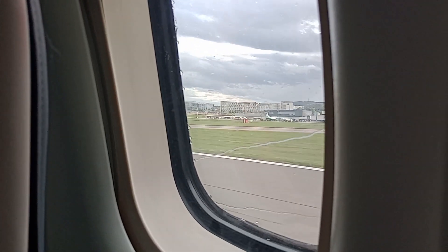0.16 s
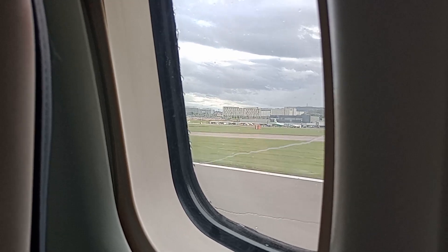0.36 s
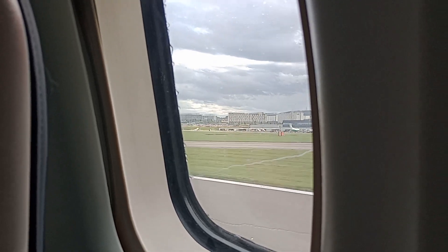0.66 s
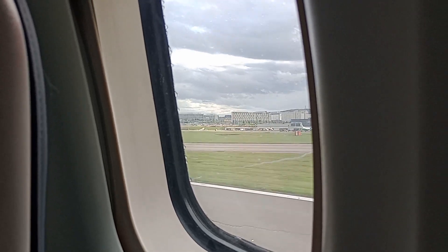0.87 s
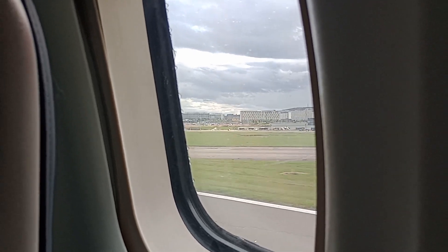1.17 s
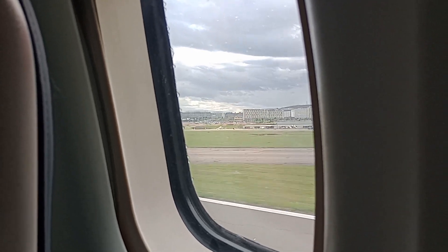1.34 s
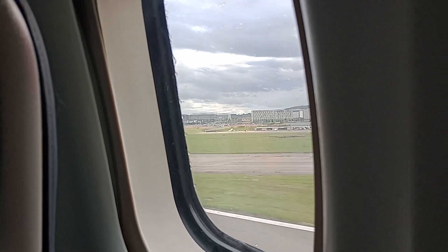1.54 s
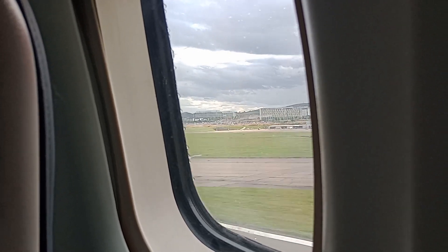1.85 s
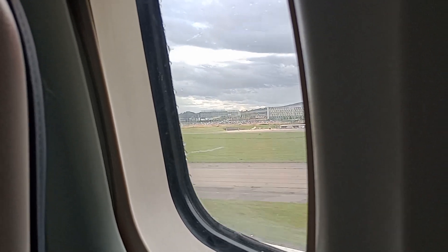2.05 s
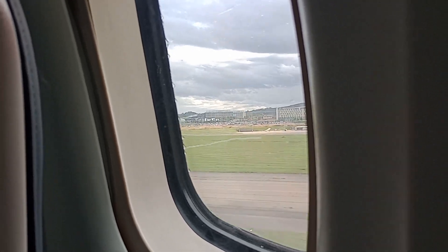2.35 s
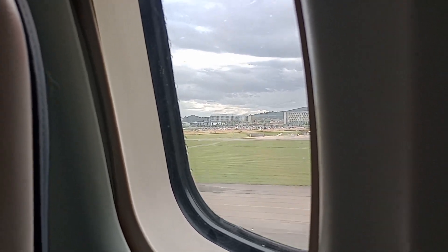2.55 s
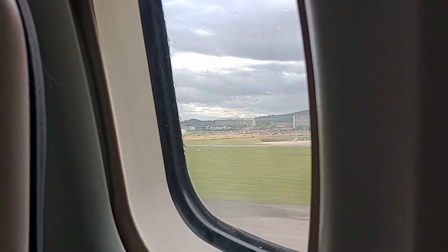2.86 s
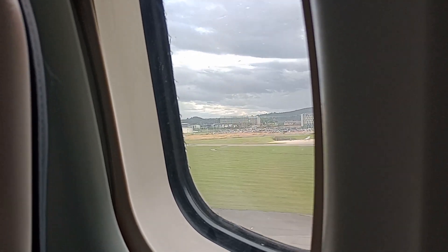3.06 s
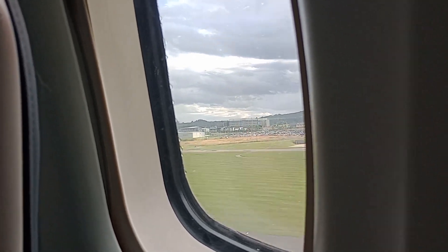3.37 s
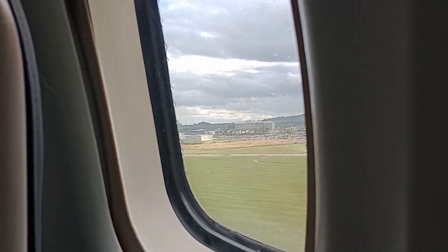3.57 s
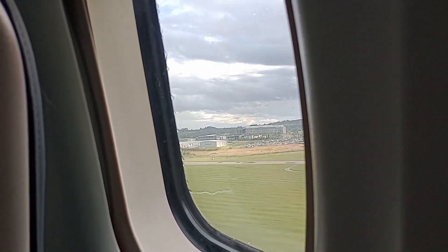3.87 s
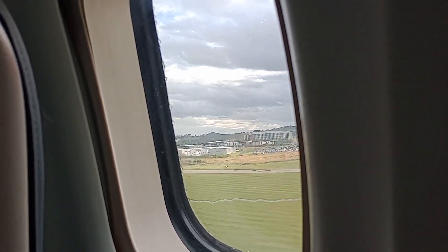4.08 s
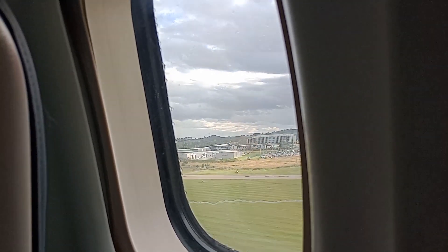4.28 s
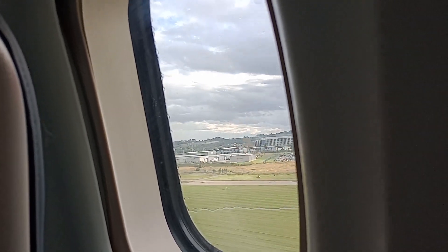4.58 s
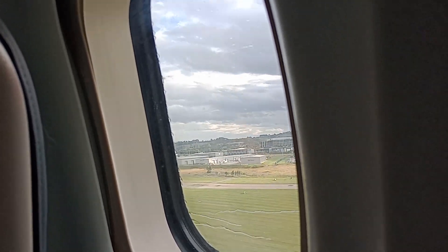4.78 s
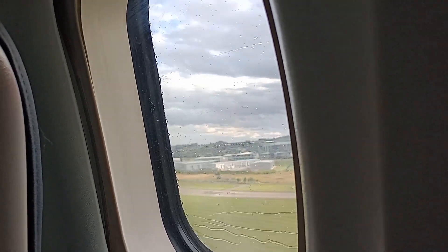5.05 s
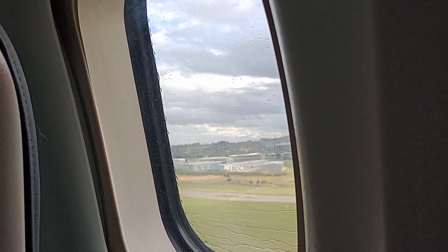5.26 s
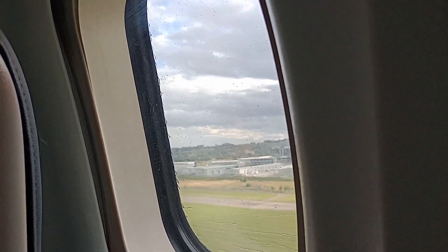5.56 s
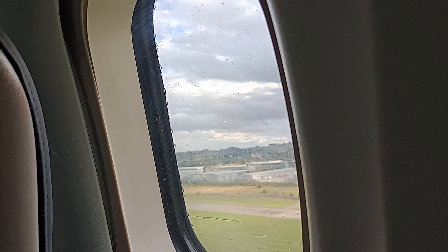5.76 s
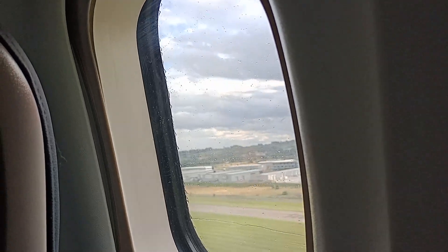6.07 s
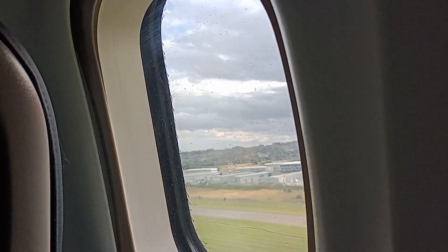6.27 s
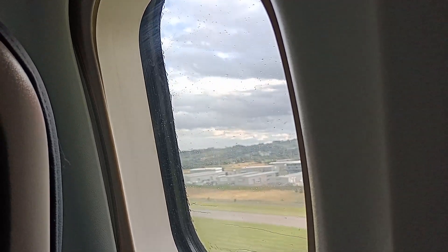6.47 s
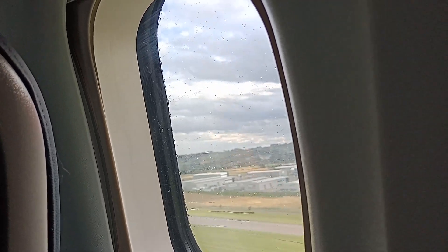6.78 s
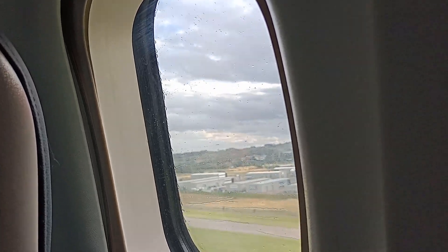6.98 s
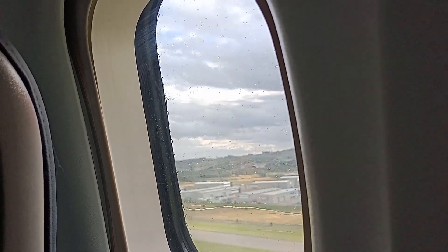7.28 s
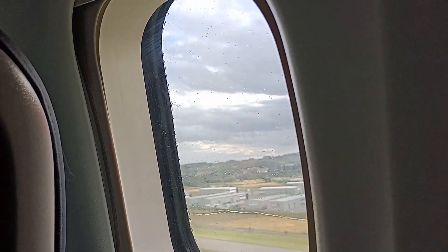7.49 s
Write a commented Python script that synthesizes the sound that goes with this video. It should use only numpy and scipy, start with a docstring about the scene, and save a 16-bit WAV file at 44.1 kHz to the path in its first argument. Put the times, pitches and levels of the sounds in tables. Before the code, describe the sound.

Heard from a window seat inside a turboprop airliner, the propellers hold a deep, steady drone at takeoff power. The wheels rumble over runway bumps and trim panels tick faintly, while air rushes along the hull under thin, high engine whines. Late on, the landing gear thumps twice as the plane lifts off, and the rumble eases into a smoother drone.

```python
"""Turboprop take-off from a window seat

Inside an airliner, microphone close to the window. The propeller blades drive a deep drone into the
cabin. The wheels rumble on the runway and shake the trim until the gear thumps at lift-off; then the
drone is smoother. Air rushes along the hull, and thin turbine and gearbox whines ride on top."""
import sys
import numpy as np
from scipy import signal
from scipy.fft import rfft, irfft, next_fast_len
from scipy.io import wavfile
from scipy.ndimage import uniform_filter1d, minimum_filter1d, map_coordinates

SR = 44100
rng = np.random.default_rng(int(sys.argv[2]) if len(sys.argv) > 2 else 0)


def waveform_to_disk(signal):
    """Save audio, clipped to [-1, 1], as 16-bit WAV at the path in sys.argv[1]."""
    frames = np.transpose(np.atleast_2d(signal))
    scaled = np.clip(frames, -1, 1) * 32767
    samples = np.round(scaled).astype(np.int16)
    wavfile.write(sys.argv[1], SR, samples)


N = 336483
TIME = np.arange(N) / SR
BLADE_HZ = 119.95  # the governor holds the propellers at one blade-pass rate


def amp(db):
    """Decibels to gain."""
    return 10 ** (np.asarray(db) / 20)


def unit(x):
    """Scale to rms 1."""
    return x / np.sqrt(np.mean(np.abs(x) ** 2) + 1e-20)


def curve(points):
    """Straight lines through (t/s, value) points, one value per sample."""
    return np.interp(TIME, *np.transpose(points))


def swell(s, half_s):
    """A bell of height 1 around one moment."""
    return np.exp(-.5 * ((TIME - s) / half_s) ** 2)


def wobble(rate):
    """A smooth random curve, rate knots a second."""
    knots = rng.standard_normal(4096)
    return map_coordinates(knots, [TIME[::32] * rate], mode="wrap").repeat(32)[:N]


def filtered(x, response):
    """x through a frequency response."""
    size = next_fast_len(N + SR // 2)
    return irfft(rfft(x, size) * response(np.fft.rfftfreq(size, 1 / SR)), size)[:N]


def coloured(x, spectrum):
    """x shaped by (f/Hz, level/dB) points on a log axis, at rms 1."""
    f, db = np.transpose(spectrum)
    return unit(filtered(x, lambda hz: amp(np.interp(np.log(hz + 1), np.log(f), db))))


def mottled(x, depth_db, frame, bins, frames):
    """x with random gain in patches, bins wide and frames long."""
    spectra = signal.stft(x, nperseg=frame)[2]
    patches = uniform_filter1d(rng.standard_normal(spectra.shape), size=bins, axis=0)
    patches = uniform_filter1d(patches, size=frames, axis=1)
    return signal.istft(spectra * amp(depth_db * unit(patches)), nperseg=frame)[1][:N]


def rush(spectrum, patchy_db):
    """Coloured noise of rms 1 with turbulent patches."""
    return coloured(mottled(rng.standard_normal(N), patchy_db, frame=512, bins=8, frames=10), spectrum)


def tone(hz):
    """A sine of rms 1 at a steady pitch or along a pitch curve."""
    return np.sqrt(2) * np.sin(2 * np.pi * (np.cumsum(hz * np.ones(N)) / SR + rng.random()))


def flutter(hz, width_hz):
    """A tone of rms 1 smeared into a narrow band by turbulence."""
    smear = unit(wobble(2 * width_hz) + 1j * wobble(2 * width_hz))
    return np.sqrt(2) * np.real(smear * np.exp(2j * np.pi * np.cumsum(hz * np.ones(N)) / SR))


def glide(first_hz, final_hz, settle_s):
    """A pitch that eases towards its final value."""
    return final_hz + (first_hz - final_hz) * np.exp(-TIME / settle_s)


def burst(s, hz, octaves, t60):
    """A dying puff of noise around one pitch, peak 1."""
    band = filtered(rng.standard_normal(N), lambda f: np.exp(-.5 * (np.log2((f + 1) / hz) / octaves) ** 2))
    age = np.maximum(TIME - s, 0)
    puff = band * amp(-60 * age / t60) * (1 - np.exp(-age * 20 / t60))
    return puff / (np.abs(puff).max() + 1e-20)


def unloading(runway_db, air_db, from_s=4.24, to_s=6):
    """A level that shifts as the wings take the weight off the wheels."""
    return np.interp(TIME, [from_s, to_s], [runway_db, air_db])


def jolts():
    """Runway bumps and gusts: the dB they add to rumble, roar and hiss."""
    # jolts: t/s, half-length/s, rumble lift/dB, roar lift/dB, hiss lift/dB
    bumps = [(0.302, 0.12, 3, 2, 0.3), (0.936, 0.066, 0.5, 4, 1.5), (2.4, .06, 0, 2, 2),
             (3.15, 0.36, 1, 0.5, 0), (3.74, 0.063, 0.5, 2, 2), (4.115, 0.24, 1, 1.2, 1.3),
             (5.295, 0.14, 1.5, 3.5, 1.3), (5.8, 0.091, 1.3, 1.5, 0)]
    return sum(np.outer(lifts_db, swell(s, half_s)) for s, half_s, *lifts_db in bumps)


def propellers(jolt_db, lift_off_s=5.621, dip_db=-13):
    """Blade-pass drone; gusts through the discs make its overtones waver and fade, jolts sharpen them."""
    # drone at the seat: t/s, level/dB
    drone_level = [(0, -10.5), (.3, -14.5), (.6, -10), (1, -13), (1.9, -11), (2.3, -13), (4, -13.5),
                   (5.2, -11.5), (5.7, -11.8), (6.4, -10.6), (7.62, -12)]
    # overtones of the blade rate: multiple, level/dB re the fundamental, slow fading/dB
    overtones = [(2, -22, 3), (3, -29.5, 2.5), (4, -41.5, 0)]
    drone_db = curve(drone_level) + .42 * wobble(6.3)
    drone_db += dip_db * swell(lift_off_s, half_s=.01)  # a brief dip as the wheels leave the ground
    bite_db = jolt_db + unloading(runway_db=0, air_db=-1)
    drone = tone(BLADE_HZ)
    for order, db, fading_db in overtones:
        waver_hz = 1.5 * wobble(25)
        drone += amp(db + bite_db + fading_db * wobble(7)) * tone(order * BLADE_HZ + waver_hz)
    return amp(drone_db) * drone


def hull_rumble(jolt_db):
    """Wheels and wake shake the hull: a lumpy rumble that eases as the wheels unload."""
    # rumble spectrum: f/Hz, relative level/dB
    spectrum = [(70, -61), (92, -2.5), (110, -1.5), (135, 3.5), (152, 0.5), (185, -1), (205, -5),
                (225, -2.5), (255, -8), (298, -6.5), (335, -12.5), (420, -31), (700, -41), (1500, -86)]
    rumble_db = unloading(runway_db=-20.5, air_db=-24.5) + jolt_db + .46 * wobble(10)
    return amp(rumble_db) * coloured(rng.standard_normal(N), spectrum)


def cabin_boom():
    """The cabin air booms low around the microphone."""
    # boom at the seat: t/s, level/dB
    boom_level = [(0, -34), (1.4, -32), (1.8, -37), (3.2, -27.5), (3.7, -32), (5, -34), (5.7, -32),
                  (6.1, -33), (7.62, -32)]
    # boom spectrum: f/Hz, relative level/dB
    spectrum = [(15, -34), (25, -23), (44, -19), (52, -30), (62, 3), (88, -3.5), (105, 1.5), (140, -47),
                (300, -74)]
    return amp(curve(boom_level)) * coloured(rng.standard_normal(N), spectrum)


def slipstream(roar_jolt_db, hiss_jolt_db, chop=.036):
    """Air roars and hisses along the hull, swelling with jolts; each blade chops the hiss a little."""
    # roar spectrum: f/Hz, relative level/dB
    roar_spectrum = [(200, -19), (380, 3.5), (450, -0.5), (520, -4.5), (610, -4.5), (760, -10),
                     (950, -10.5), (1350, -18.5), (1550, -19), (2000, -27.5), (4000, -38.5)]
    # hiss spectrum: f/Hz, relative level/dB
    hiss_spectrum = [(900, -24), (2000, -2), (2900, 0), (3800, -4.5), (4500, 1), (5000, -3.5), (5350, -1.5),
                     (6000, -5.5), (7000, -0.5), (8300, -5.5), (9300, -1), (10000, -4.5), (10400, -5),
                     (15500, -14)]
    gust = wobble(18)
    lull_db = -1.2 * swell(1.4, half_s=.4)  # the hiss thins early in the roll
    roar_db = unloading(runway_db=-36, air_db=-37) + roar_jolt_db + .65 * gust
    hiss_db = -47.5 + hiss_jolt_db + lull_db + .68 * gust
    blades = 1 + chop * tone(BLADE_HZ)
    roar = rush(roar_spectrum, patchy_db=-.3)
    hiss = window_recess(rush(hiss_spectrum, patchy_db=.37))
    return amp(roar_db) * roar + amp(hiss_db) * blades * hiss


def window_recess(hiss):
    """Reflections off window and wall comb the treble; the comb shifts slowly as the microphone drifts."""
    return unit(mottled(hiss, depth_db=1.3, frame=2048, bins=6, frames=90))


def gearbox(trim_db=.5):
    """Faint gear tones flutter on their way in through wing and hull."""
    # gear tones: f/Hz, level before trim/dB, width/Hz
    gear_tones = [(1421, -66, 7), (1455, -66, 10), (1746, -66, 25), (3306, -71, 6), (4375, -69, 30),
                  (4428, -65.5, 14), (4635, -66, 25), (4850, -71, 20), (6670, -68, 8), (8731, -72, 4),
                  (8850, -70, 4), (9212, -71, 4), (9330, -70, 4)]
    return sum(amp(db + trim_db) * flutter(hz, width_hz) for hz, db, width_hz in gear_tones)


def climbing_whines(joined_s=7.4, fade_s=.63, join_db=-48.5, join_hz_per_s=15):
    """One whine climbs as speed builds; in the air a second fades in just above it."""
    # first whine at the seat: t/s, level/dB
    first_level = [(0, -51), (2.5, -53), (3, -65), (4, -51), (5, -53), (5.7, -68), (6.9, -56), (7.25, -52)]
    first_hz = glide(944, 1000, settle_s=4.2)
    second_hz = 1009 + join_hz_per_s * (TIME - joined_s)
    second_gain = amp(join_db) * np.clip(1 + (TIME - joined_s) / fade_s, 0, 1)
    whines = np.zeros(N)
    for hz, gain in (first_hz, amp(curve(first_level))), (second_hz, second_gain):
        whines += gain * amp(1.4 * wobble(14)) * tone(hz + 2.5 * wobble(25))
    return whines


def turbine_and_compressor(compressor_hz=9706, octave_db=-13):
    """Two high engine whines flutter through the hull; the turbine's octave is a thin band of hiss."""
    # turbine at the seat: t/s, level/dB
    turbine_level = [(0, -61), (.7, -64), (1.4, -55.5), (2.1, -59), (3.6, -53), (4.9, -54), (5.4, -52.5),
                     (5.92, -55.5), (6.05, -62), (7, -66), (7.5, -57)]
    # compressor at the seat: t/s, level/dB
    compressor_level = [(0, -64), (.7, -67), (1.6, -59), (2.9, -65), (3.8, -57), (4.6, -62.5), (5.8, -62.5),
                        (7.62, -56.2)]
    turbine_hz = glide(6706, 6687, settle_s=2.7)
    whines = np.zeros(N)
    for hz, level in (turbine_hz, turbine_level), (compressor_hz, compressor_level):
        whines += amp(curve(level)) * (tone(hz + .8 * wobble(6)) + .33 * flutter(hz, width_hz=30))
    octave = amp(curve(turbine_level) + octave_db) * flutter(2 * turbine_hz, width_hz=100)
    return whines + octave


def trim_ticks(octaves=.61):
    """Shaken trim panels tick in the cabin."""
    # ticks: t/s, peak level/dB, f/Hz, t60/s
    ticks = [(.468, -31.5, 9800, .025), (.737, -35, 5500, .03), (2.95, -36.5, 5000, .04),
             (4.06, -36, 5000, .06), (4.38, -38, 4300, .04), (5.117, -37, 6000, .04),
             (5.62, -23, 10000, 0.008), (7.399, -39, 9000, .025)]
    return sum(amp(db) * burst(s, hz, octaves, t60) for s, db, hz, t60 in ticks)


def gear_thumps():
    """The landing gear unloads and drops to its stops, heard through the floor."""
    # thumps: t/s, level/dB
    thumps = [(5.23, -24.5), (5.612, -20.5)]
    # the floor's boom, thud, clunk and rattle: f/Hz, width/octaves, level/dB re the thump, t60/s
    floor_bands = [(73, .2, -1.5, .4), (230, .4, 2, .17), (520, .7, -.5, .11), (1800, .9, -14, .06)]
    return sum(amp(db + band_db) * burst(s, hz, octaves, t60)
               for s, db in thumps for hz, octaves, band_db, t60 in floor_bands)


def scene():
    """Everything that reaches one microphone at the window seat."""
    rumble_jolt_db, roar_jolt_db, hiss_jolt_db = jolts()
    lows = propellers(rumble_jolt_db) + hull_rumble(rumble_jolt_db) + cabin_boom()
    air = slipstream(roar_jolt_db, hiss_jolt_db)
    whines = gearbox() + climbing_whines() + turbine_and_compressor()
    return (lows + air + whines + trim_ticks() + gear_thumps())[None]


def record(dry):
    """The recorder's limiter holds down the highest peaks; nothing passes above its band limit."""
    threshold, top_hz = .6, 15820
    needed_gain = np.minimum(1, threshold / (np.abs(dry[0]) + 1e-9))
    gain = uniform_filter1d(minimum_filter1d(needed_gain, size=700), size=1400)
    return filtered(dry[0] * gain, lambda hz: np.clip((top_hz - hz) / 100, 0, 1))[None]


dry = scene()
out = record(dry)
waveform_to_disk(out)
```